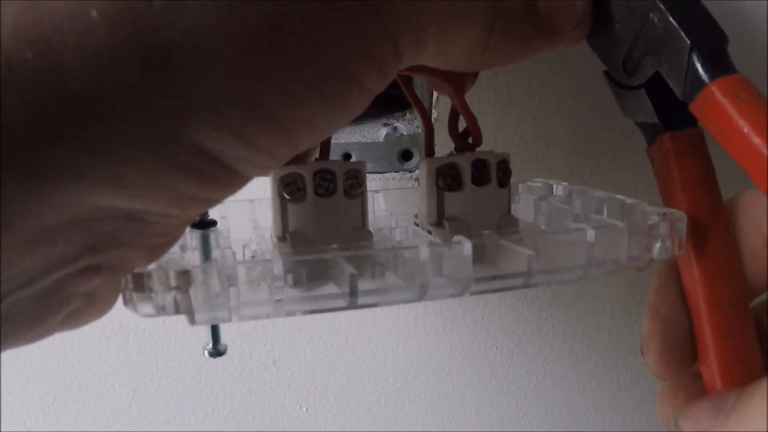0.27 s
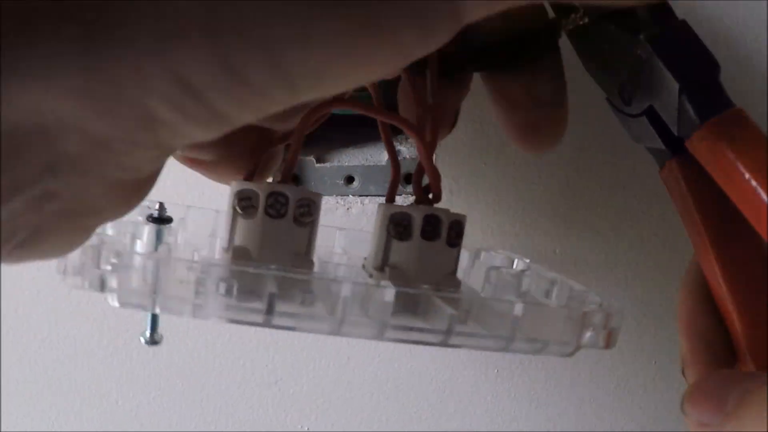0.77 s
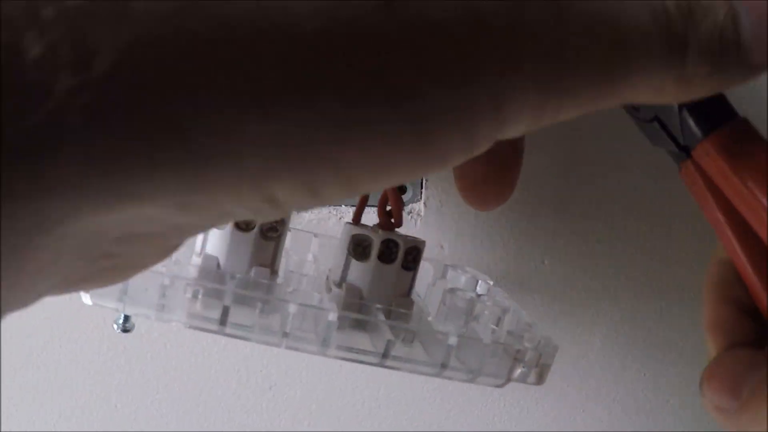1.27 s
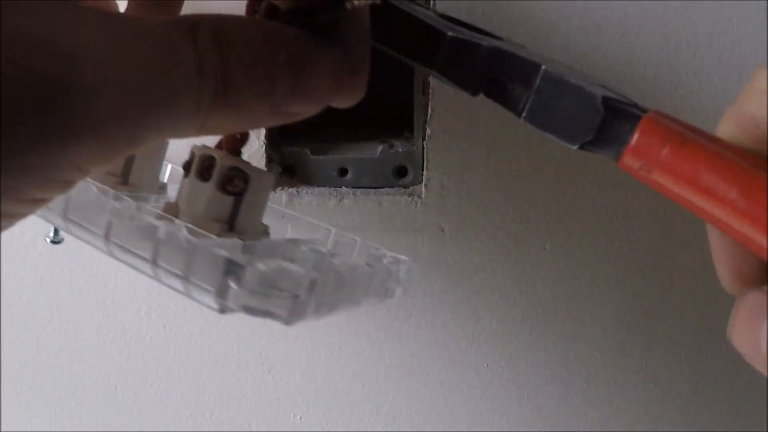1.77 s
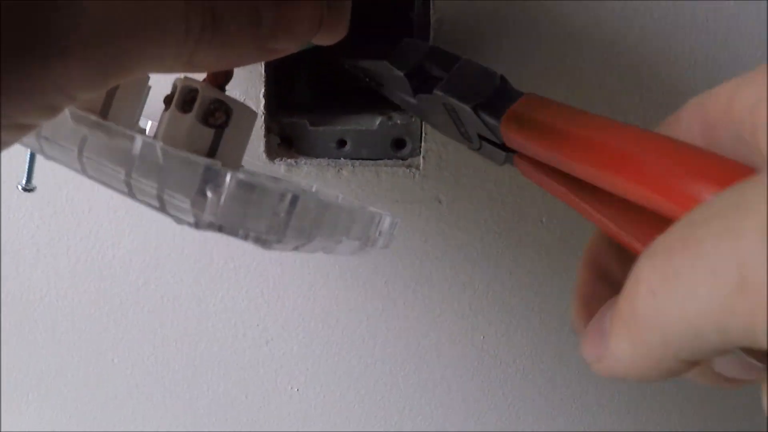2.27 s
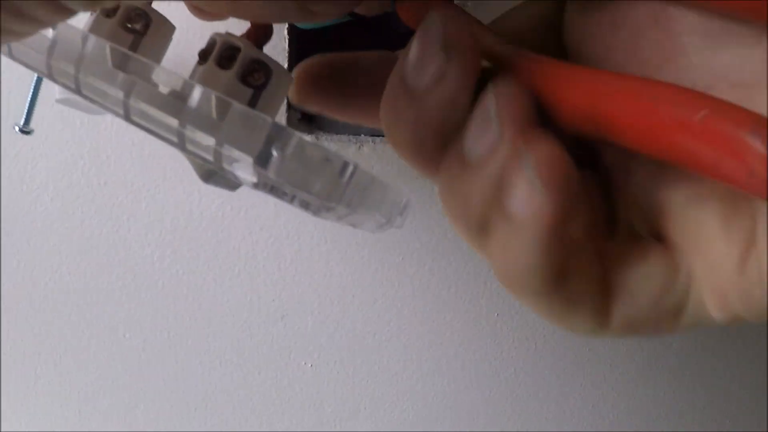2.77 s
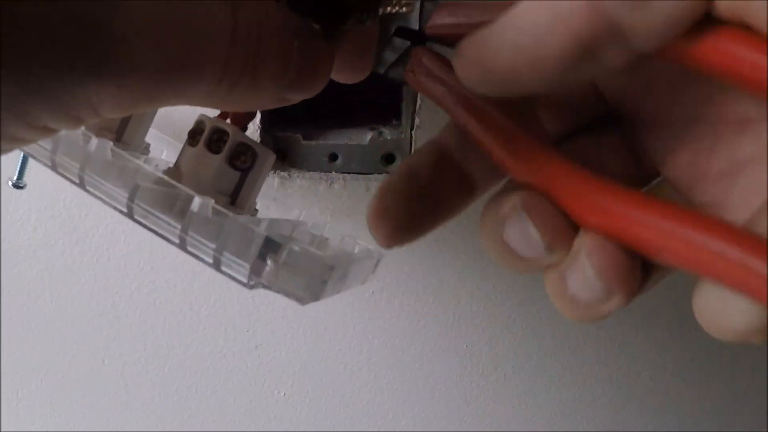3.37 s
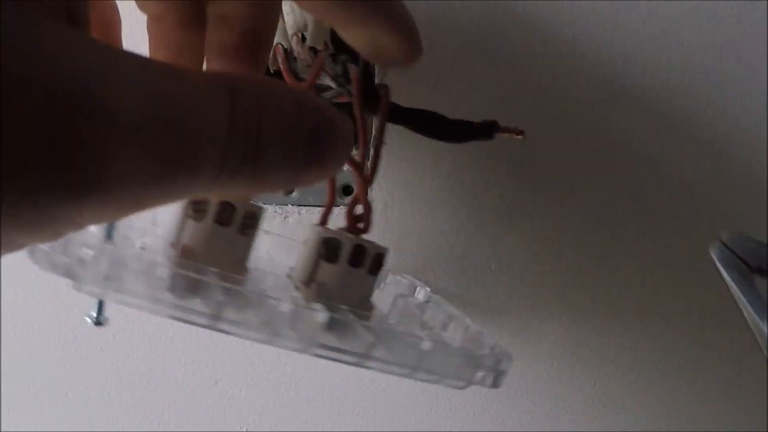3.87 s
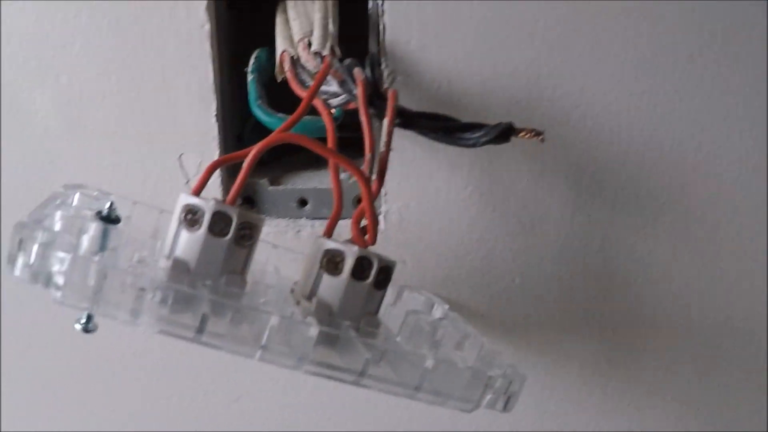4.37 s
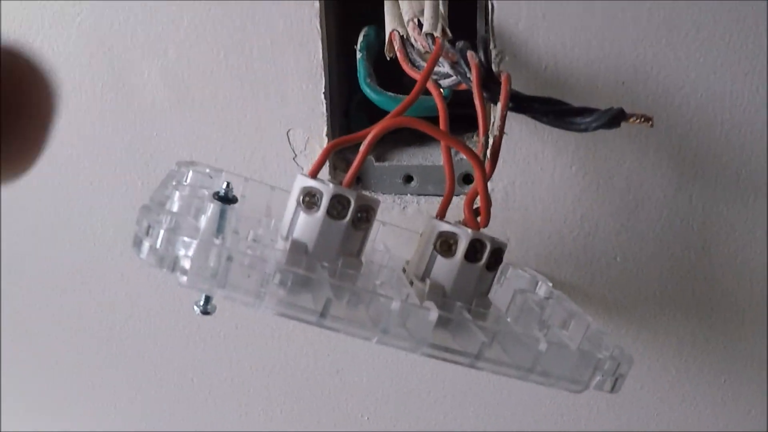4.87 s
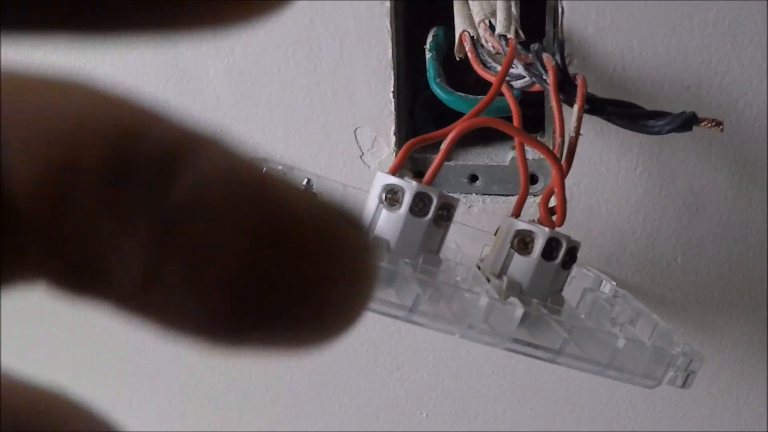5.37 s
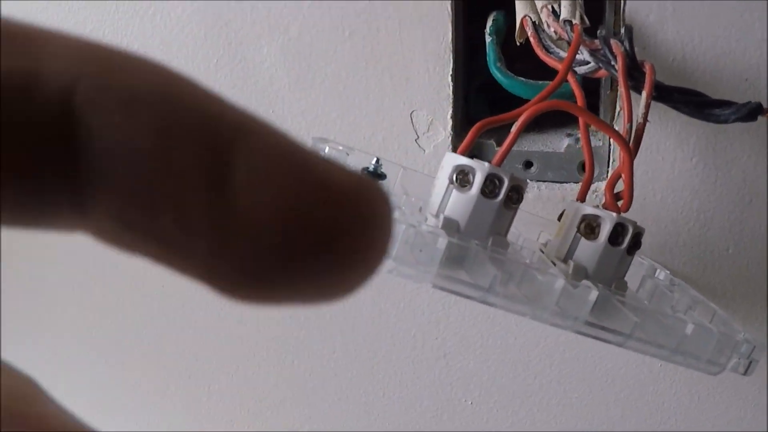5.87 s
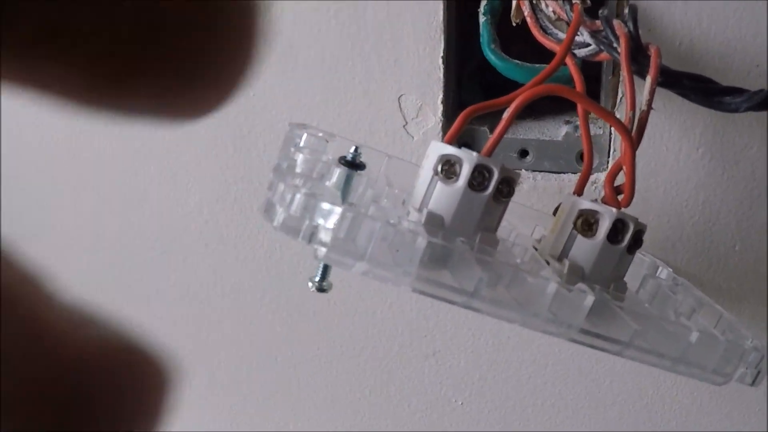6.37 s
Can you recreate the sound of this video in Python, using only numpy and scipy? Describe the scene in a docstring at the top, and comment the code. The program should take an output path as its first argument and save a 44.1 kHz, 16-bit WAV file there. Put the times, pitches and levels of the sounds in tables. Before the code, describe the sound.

Quiet indoor air with a wavering low hum. Faint ticks, then a bright double clack of plier jaws, a pause, more clacks and fine wire scraping with soft low bumps. Then the tool is silent and the camera itself is knocked: boomy thuds, sharp snaps and muffled finger rubs, the loudest overloading the close microphone so that the background dips and returns.

```python
"""A wall box in a quiet room: pliers grip and twist copper wires close to a small camera.
Contacts excite jaws, switch plate and wire strands; dragged wire scrapes as dense random slips.
Hands later shift the camera: its housing thumps, snaps, rubs and rumbles, and the wall rings.
A wavering drone and shaped stereo noise fill the room; overloads make a gain control duck everything."""
import sys
import numpy as np
from scipy import signal
from scipy.io import wavfile

SR = 44100
rng = np.random.default_rng(int(sys.argv[2]) if len(sys.argv) > 2 else 0)


def materialize(psi):
    """Save the field psi as 16-bit PCM at rate SR to the path in sys.argv[1].

    A 1-D psi becomes a single channel; in a 2-D psi each row is a channel.
    """
    bounded = np.clip(np.atleast_2d(psi).T, -1, 1)
    quanta = np.round(bounded * 32767).astype(np.int16)
    wavfile.write(sys.argv[1], SR, quanta)


N = 292824


def from_db(db):
    """Level to amplitude: 20 dB is a factor of ten."""
    return 10 ** (np.asarray(db) / 20)


def rms_one(x):
    """Normalisation: scales to unit rms."""
    return x / np.sqrt(np.mean(x ** 2) + 1e-20)


def filtered(x, order, hz, kind="low"):
    """Butterworth filtering: a maximally flat pass band."""
    return signal.sosfilt(signal.butter(order, hz, kind, fs=SR, output="sos"), x)


def in_time(rows):
    """Linear interpolation: each column of a curve becomes one value a sample."""
    s, *columns = np.transpose(rows)
    return [np.interp(np.arange(N) / SR, s, column) for column in columns]


def strokes(rows, attack_s, release_s):
    """Gating: yields each stroke's soft-edged gate, its progress 0-1 and its other columns."""
    t = np.arange(N) / SR
    for start, length, *columns in rows:
        rise = (t - start) / attack_s
        fall = (start + length - t) / release_s
        gate = np.clip(np.minimum(rise, fall), 0, 1)
        yield gate, np.clip((t - start) / length, 0, 1), *columns


def at_hz(points, hz):
    """Logarithmic frequency: reads a curve of (f, value) on a log axis."""
    f, value = np.transpose(points)
    return np.interp(np.log(hz), np.log(f), value)


def panned(x, pan_db):
    """Interchannel level difference: left over right in dB."""
    return x * from_db([[pan_db / 2], [-pan_db / 2]])


def resonate(x, modes):
    """Modal superposition: parallel resonators of (f/Hz, bandwidth/Hz, level/dB), signs alternating."""
    out = 0
    for k, (hz, width, level_db) in enumerate(modes):
        r = np.exp(-np.pi * width / SR)   # pole radius
        b = [(1 - r * r) / 2, 0, (r * r - 1) / 2]
        a = [1, -2 * r * np.cos(2 * np.pi * hz / SR), r * r]
        out = out + (-1) ** k * from_db(level_db) * signal.lfilter(b, a, x)
    return out


def grains(per_s, spread_db):
    """Stick-slip as a random point process: impulses of uneven size and random sign."""
    size_db = spread_db * np.minimum(rng.exponential(1, N), 4)
    sizes = from_db(size_db) * rng.choice([-1, 1], N)
    return sizes * (rng.random(N) < per_s / SR) + 1e-18


def drift(hz):
    """Slow random modulation: normal values, two per cycle of hz, joined by straight lines."""
    return np.interp(np.arange(N) * 2 * hz / SR, np.arange(1200), rng.standard_normal(1200))


def add(out, sound, s):
    """Superposition: mixes a short sound in at a time."""
    i = round(s * SR)
    out[:, i:i + sound.shape[1]] += sound[:, :N - i]


# contacts of the pliers: t/s, then peak level/dB and main ring f/Hz for jaws, switch plate
# and strands in turn, then left-right level/dB
CONTACTS = [(0.716, -48.5, 3080, -37, 1220, -44, 6400, 6), (0.9066, -25, 4720, -47.5, 1250, -44, 5300, 4),
            (0.913, -40, 2710, -35, 1610, -50, 5340, 7), (0.981, -46.5, 2780, -40.5, 2400, -44, 5940, 5),
            (1.054, -25.5, 4520, -54, 1230, -47, 6480, 9), (1.0716, -9.5, 4260, -18, 2380, -35, 5860, -4),
            (1.0778, -8, 4040, -14.5, 1740, -4.5, 5880, 8.5),
            (1.0846, -31.5, 3850, -28, 1740, -22, 5840, 1), (1.1, -33, 4670, -34, 2430, -34, 5800, 1),
            (1.113, -43.5, 4690, -45, 1790, -26, 5630, 9), (1.119, -41, 3980, -51, 1400, -35, 5830, 2),
            (1.128, -43, 3880, -37, 2350, -34, 5800, 11), (1.238, -33.5, 4630, -38.5, 2350, -52, 6550, 4),
            (1.259, -36, 3700, -40.5, 1220, -42.5, 6750, 7), (1.369, -42, 2850, -33.5, 2280, -43, 6400, 4),
            (1.834, -41, 3100, -50, 1360, -41, 6160, 5), (1.912, -38.5, 4770, -41.5, 1700, -38, 5900, 6),
            (2.3822, -34, 3700, -30.5, 1480, -42, 6100, 4), (2.603, -43, 3640, -33.5, 1370, -45, 6310, 3),
            (2.6388, -15, 2870, -3.5, 1644, -25, 5300, 7.5), (2.644, -40, 2890, -21.5, 1640, -25, 5170, 20),
            (2.65, -9.5, 2910, -10.5, 1750, -18, 5950, 2), (2.657, -20, 2950, -16, 1380, -41, 5840, 7),
            (2.703, -46, 3080, -34, 1340, -47, 5320, 1), (2.759, -32, 3500, -30, 1500, -46, 6200, 6.5),
            (2.974, -37.5, 3600, -40, 1230, -36, 7260, 3), (3.011, -44, 3550, -45.0, 1340, -37, 6550, 5),
            (3.021, -40, 4660, -43, 1390, -45, 5620, 5), (3.032, -44, 3210, -36, 2050, -47, 5920, 8),
            (3.051, -49, 3440, -38, 1470, -51, 7280, 5), (3.145, -50, 2890, -40, 2070, -51, 6240, 6),
            (3.207, -29, 4730, -43, 1210, -34, 6720, 5), (3.213, -24.5, 4900, -30.5, 2390, -31, 6800, 9),
            (3.2195, -35, 2800, -30, 2500, -42, 6550, -2), (3.26, -23, 3700, -23.5, 1860, -22, 6480, 9),
            (3.265, -31, 3430, -33, 1970, -27, 6220, -4), (3.302, -44, 2860, -37, 1800, -43, 6590, 5),
            (3.389, -19, 3480, -27, 1680, -23, 5640, -11), (3.3913, -7.5, 3630, -15, 1660, -16, 5250, 3),
            (3.3958, -36, 3470, -26, 2470, -32, 5410, 4), (3.398, -21, 3600, -24.5, 2600, -12, 5300, 6),
            (3.405, -25, 4940, -39.0, 1780, -32, 5700, 14), (3.413, -36, 4930, -48, 1360, -35.5, 5320, 4.5),
            (3.447, -40, 3360, -44, 1640, -43, 5400, 2.0), (3.614, -54, 3140, -36.5, 1300, -53.5, 7170, 4),
            (3.645, -44, 3190, -27.5, 1480, -40, 6000, 8), (3.7275, -21, 3270, -16, 2580, -15, 5450, 14),
            (3.7291, -8.5, 2970, -22, 2580, -16.5, 7060, -6),
            (3.7358, -15.5, 2980, -27, 2560, -14, 5560, 7), (3.742, -30, 4780, -39, 1210, -28, 5360, 10),
            (3.818, -33.5, 4410, -40, 1490, -38, 6700, 6), (3.982, -51, 2710, -36, 1350, -53, 5510, 5),
            (4.002, -29.5, 4070, -47, 2280, -48, 6740, 6), (4.0236, -27, 4300, -26.5, 1620, -29, 6000, 5),
            (4.029, -34, 4600, -35, 1280, -43, 5400, 7), (4.175, -40, 4500, -36, 2600, -53, 6850, 6),
            (4.474, -44, 2820, -38.5, 1670, -53, 5380, 5)]
# further modes of jaws, switch plate and strands: f/Hz, bandwidth/Hz, level/dB against the main ring
JAW_MODES = [(3300, 390, -6), (3700, 1000, -4), (4330, 530, -3.5)]
PLATE_MODES = [(1710, 320, 3.5), (1683, 140, 1.5), (2280, 340, 3)]
STRAND_MODES = [(5300, 260, -10), (6040, 310, -5.5), (6670, 200, -38.5), (9900, 220, -3.5),
                (13570, 2000, -6.5)]
CHATTER_T60_S = 0.016
IMPACT, IMPACT_PER_DB = 5.7, 0.42   # size at 0 dB; hard contacts are mostly one impact
ONSET_S, ONSET_PER_DB = .00008, 1.1   # time at 0 dB; soft clicks have a slower, noisier onset


def clicks():
    """Modal excitation by impact: one blow and a brief chatter ring plate, jaws and strands."""
    out, t = np.zeros((2, N)), np.arange(round(.05 * SR)) / SR
    chatter = rng.standard_normal((len(CONTACTS), 2, len(t)))
    chatter[:, 1] = 0.79 * chatter[:, 0] + 1.57 * chatter[:, 1]   # partly alike on both channels
    chatter *= from_db(-60 * t / CHATTER_T60_S)
    for contact, small in zip(CONTACTS, chatter):
        s, jaws_db, jaws_hz, plate_db, plate_hz, strands_db, strands_hz, pan_db = contact
        force_db = max(jaws_db, plate_db, strands_db)
        onset_s = ONSET_S * from_db(-ONSET_PER_DB * force_db)
        hits = small * (1 - np.exp(-(t / onset_s) ** 2))
        hits[:, 14] += IMPACT * from_db(IMPACT_PER_DB * force_db)
        parts = ((jaws_db, jaws_hz, JAW_MODES), (plate_db, plate_hz, PLATE_MODES),
                 (strands_db, strands_hz, STRAND_MODES))
        sound = 0
        for level_db, hz, modes in parts:
            # modes far from the main ring sound mainly in the first moments
            near = resonate(hits, [(hz, .75 * hz, 0)])
            main = resonate(near, [(hz, .11 * hz, 2.5)]) + resonate(near, [(hz, .04 * hz, -1)])
            onset = from_db(-3.5) * resonate(hits * np.exp(-t / .0015), modes)
            ring = main + resonate(near, modes) + onset + from_db(-17.5) * near
            sound = sound + from_db(level_db) * ring / np.abs(ring).max()
        add(out, panned(sound, pan_db), s)
    return filtered(out, 3, 10500)


# wire dragged through the jaws: start t/s, length t/s, starting level/dB, fade over the stroke
# level/dB (negative swells), brightest f/Hz
DRAGS = [(.85, 0.1, -65, -8, 5300), (1.085, 0.14, -47, 20, 5570), (1.75, 0.22, -62, 0, 6470),
         (2.655, 0.28, -47.5, 28, 2620), (2.97, 0.19, -55, 23, 5030), (3.21, 0.19, -51.5, 24, 5370),
         (3.4, 0.085, -50.5, 11, 4840), (3.74, 0.14, -48.5, 23, 5450), (3.99, 0.09, -51, 9, 2530)]
SCRAPE_ATTACK_S, SCRAPE_RELEASE_S = 0.0072, 0.021
CATCH_DB, CATCH_HZ = 4, 60   # the dragged wire catches and frees


def scrape():
    """Stick-slip excitation: dense slips ring the clicks' modes, most those near the brightest pitch."""
    slips = grains(per_s=2100, spread_db=1.0)
    modes, out = PLATE_MODES + JAW_MODES + STRAND_MODES, 0
    # under the drag each mode is broader than when struck
    rings = np.array([rms_one(resonate(slips, [(hz, 1.74 * width, 0)])) for hz, width, _ in modes])
    hz, _, mode_db = np.transpose(modes)
    for gate, progress, level_db, fade_db, bright_hz in strokes(DRAGS, SCRAPE_ATTACK_S, SCRAPE_RELEASE_S):
        octaves_off = np.abs(np.log2(hz / bright_hz))
        gain = from_db(mode_db - 19.0 * octaves_off)
        coloured = (gain @ rings) / np.sqrt(gain @ gain)
        out = out + gate * from_db(level_db - fade_db * progress) * coloured
    out = filtered(out, 2, 8000)
    return panned(out * from_db(CATCH_DB * drift(CATCH_HZ)), 3.3)


# blows on housing and wall: t/s, thump level/dB, thump rate f/Hz (scales its time course),
# knock level/dB, wall drive level/dB (before WALL_GAIN_DB), shudder decay t/s
IMPACTS = [(1.077, -62, 59, -30, -36.5, 0.0079), (1.877, -77, 90, -34, -34, 0.0057),
           (1.892, -77, 90, -49, -37, 0.0051), (2.639, -59.5, 71, -46, -29.5, 0.011),
           (2.6549, -46, 71, -44, -19, 0.0091), (2.705, -60, 71, -48, -28.5, 0.019),
           (2.772, -60, 71, -50, -33.5, 0.017), (3.17, -25.5, 80, -41, -38.5, 0.024),
           (3.241, -24, 69.4, -45, -36, 0.021), (3.29, -36, 70, -50, -41, 0.024),
           (3.343, -29, 70, -49.5, -37.5, .015), (3.395, -33, 70, -46, -39.5, 0.025),
           (3.59, -27, 70, -39, -46.5, 0.084), (3.728, -50, 70, -39, -36.5, 0.008),
           (4.033, -60, 80.6, -28, -37, 0.054), (4.687, 1.2, 57.3, -21, -21.5, 0.014),
           (4.796, -7.5, 43, -19.5, -52, .009), (5.046, -24, 61, -40, -42, 0.0072),
           (5.663, -41, 60, -20.5, -55, 0.0077), (5.664, -8, 57.7, -41, -56.5, 0.0064),
           (5.742, -19.5, 44.7, -43, -54, 0.013), (6.031, -49, 60, -18.5, -62.5, .005),
           (6.042, 2.5, 52, -12, -25.5, .005), (6.162, -45, 60, -28, -59, 0.012),
           (6.182, -8, 36, -27.5, -43, 0.03)]
# hollow wall modes: f/Hz, bandwidth/Hz, level/dB
WALL_MODES = [(121.5, 4.1, -3.5), (152, 5.1, 4), (199.6, 11.1, 3), (237, 9.9, -7.5), (281.6, 22, -9.5),
              (399, 16.4, -16), (453, 34, -15), (539, 60, -22.5)]
# housing modes: f/Hz, bandwidth/Hz, level/dB
BODY_MODES = [(190, 105, -3.5), (251, 45, -2), (336, 50, -12), (498, 28, -5.5), (602, 69, -5),
              (633, 40, -4)]
# housing surface modes, the last one broad treble: f/Hz, bandwidth/Hz, level/dB
SURFACE_MODES = [(940, 90, 0.5), (1210, 150, 5), (1490, 260, 0.5), (1838, 270, 2), (3300, 3300, -7.5)]
HOUSING_RING_DB, HOUSING_RING_S = 7.5, 0.007   # against the knock; decay of the drive
SURFACE_RING_DB, SURFACE_RING_S = -13.5, 0.013
# first contact against the shudder that follows, its factor at 0 dB; more so when hard
WALL_STRIKE, STRIKE_PER_DB = 4.7, 0.72
WALL_GAIN_DB = 28.5   # narrow modes pass little of a short shove


def blows():
    """Impulse response: a knock flexes the shell, a soft low push follows, and the wall rings on."""
    out, shove = np.zeros((2, N)), np.zeros((2, N))
    t = np.arange(round(.3 * SR)) / SR
    knock = np.sin(2 * np.pi * 620 * t) * np.exp(-t / 0.00092)
    rattles = rng.standard_normal((len(IMPACTS), len(t)))
    for (s, thump_db, thump_hz, knock_db, ring_db, shudder_s), rattle in zip(IMPACTS, rattles):
        pushed = np.maximum(t - .0013, 0)
        cycles = pushed * thump_hz
        onset = 1 - np.exp(-(pushed / 0.0016) ** 2)
        # the push falls in pitch as the housing settles
        thump = np.sin(2 * np.pi * cycles ** 0.47) * np.exp(-cycles / 0.71) * onset
        add(out, panned(from_db(thump_db) * thump + from_db(knock_db) * knock, -4.0), s)
        shell = filtered(resonate(rattle * np.exp(-t / HOUSING_RING_S), BODY_MODES), 4, 800)
        add(out, panned(from_db(knock_db + HOUSING_RING_DB) * shell, -21.5), s)
        buzz = resonate(rattle * np.exp(-t / SURFACE_RING_S), SURFACE_MODES[:4])
        add(out, panned(from_db(knock_db + SURFACE_RING_DB) * buzz, -4.5), s)
        strike = WALL_STRIKE * from_db(STRIKE_PER_DB * ring_db) * np.sqrt(shudder_s * SR)
        push = rattle * np.exp(-t / shudder_s) + (t == 0) * strike
        add(shove, panned(from_db(ring_db) * push, -1.1), s)
    wall = filtered(resonate(shove + 1e-18, WALL_MODES), 4, 100, "high")
    return out + from_db(WALL_GAIN_DB) * wall


# snaps of the shell, each with a low tone near 140 Hz swelling into it: snap t/s, snap level/dB,
# middle and high ring level/dB (against the low one), swell level/dB, swell f/Hz, growth t/s,
# swell length before the snap t/s, last crest before the snap t/s
SNAP_EVENTS = [(4.6863, -4.5, -17, -37.5, -7, 142.4, 0.034, 0.024, 0.0013),
               (4.797, -26.5, -16, -44.5, -39.5, 138, 0.0075, 0.021, .002),
               (6.042, -4.5, -3.5, -20, -8.5, 140.4, 0.012, 0.038, 0.0018)]
# low, middle and high shell modes of the snap: f/Hz, decay t/s
SHELL_MODES = [(1300, 0.00023), (2280, 0.00057), (3900, 0.00069)]
SNAP_RISE_S, SNAP_TOP_HZ = 0.00054, 4300
FLEX_DB, FLEX_HZ, FLEX_S = -1.5, 330, 0.0029   # the shell swings back


def snaps():
    """Damped modal ringing: a low tone swells into each snap, and the shell rings in its modes."""
    out, lead_s = np.zeros((2, N)), .1
    since = np.arange(round(.15 * SR)) / SR - lead_s   # time from the snap
    after = np.maximum(since, 0)
    rise = np.sin(np.pi / 2 * np.clip(1 + since / SNAP_RISE_S, 0, 1)) ** 2
    low, middle, high = (np.cos(2 * np.pi * hz * after) * np.exp(-after / decay_s)
                         for hz, decay_s in SHELL_MODES)
    flex = from_db(FLEX_DB) * np.sin(2 * np.pi * FLEX_HZ * after) * np.exp(-after / FLEX_S)
    for s, snap_db, middle_db, high_db, swell_db, swell_hz, growth_s, length_s, crest_s in SNAP_EVENTS:
        snap = rise * (low + from_db(middle_db) * middle + from_db(high_db) * high) - flex
        snap = filtered(snap, 6, SNAP_TOP_HZ)
        # grows until 2 ms after the snap, then dies away
        envelope = np.exp(np.minimum((since - .002) / growth_s, (.002 - since) / 0.0028))
        onset = np.clip((since + length_s) / 0.0019, 0, 1)
        swell = np.cos(2 * np.pi * swell_hz * (since + crest_s)) * envelope * onset
        sound = panned(from_db(snap_db) * snap, -3.5) + panned(from_db(swell_db) * swell, -4.0)
        add(out, sound, s - lead_s)
    return out


# skin sliding over the housing: start t/s, length t/s, body starting level/dB, swell over the
# stroke level/dB, surface and treble level/dB (against the body)
SLIDES = [(4.028, 0.059, -28, -17, -16, -18), (4.579, 0.12, -27.5, 16, -12.5, -31),
          (4.81, 0.054, -31.5, 14.5, -10.5, -24.5), (5.691, 0.059, -23.5, -3.5, -11.5, -36),
          (6.155, 0.061, -43.5, -2.5, -6, -25), (6.195, 0.052, -45, 7, 3, -7),
          (6.228, 0.067, -36, 5, -4.5, -17), (6.52, 0.13, -61, 7, 4, -3.5)]
RUB_ATTACK_S, RUB_RELEASE_S = 0.013, 0.029
SURFACE_SWELL = 0.68   # surface and treble take this share of the swell
RUB_PULSE_DB, RUB_PULSE_HZ = 3.5, 71   # the grip of the skin comes and goes
PORT_LAG_SAMPLES = 9


def rub():
    """Stick-slip friction: the lowest mode is alike at both ports, the rest partly inverted and late at left."""
    slips = np.array([grains(per_s=1800, spread_db=5.5), grains(per_s=1600, spread_db=2.0)])
    slips[0] = 0.36 * slips[0] - 0.61 * np.roll(slips[1], PORT_LAG_SAMPLES)
    body = resonate(slips[1], BODY_MODES[:1]) + resonate(slips, BODY_MODES[1:])
    body = rms_one(filtered(body, 6, 700))
    surface = rms_one(filtered(resonate(slips, SURFACE_MODES[:4]), 5, [880, 2150], "band"))
    treble = rms_one(resonate(resonate(slips, SURFACE_MODES[4:]), SURFACE_MODES[4:]))
    out = 0
    for gate, progress, body_db, swell_db, surface_db, treble_db in strokes(SLIDES, RUB_ATTACK_S, RUB_RELEASE_S):
        upper = from_db(surface_db) * surface + from_db(treble_db) * treble
        lower = from_db(swell_db * progress) * body
        upper = from_db(SURFACE_SWELL * swell_db * progress) * upper
        out = out + gate * from_db(body_db) * (lower + upper)
    return panned(out * from_db(RUB_PULSE_DB * drift(RUB_PULSE_HZ)), -2.5)


# tremor of the hands that hold the camera: t/s, deep rumble level/dB, upper rumble level/dB
TREMOR = [(2.6, -78, -85), (2.72, -48, -41), (2.85, -43, -46), (3.01, -48.5, -59), (3.33, -40, -47),
          (3.66, -51.5, -58), (4.05, -49.5, -66), (4.44, -59.5, -70), (4.74, -41, -52.5),
          (4.99, -59.5, -47.5), (5.16, -50, -50), (5.2, -34, -61), (5.38, -43, -58), (5.47, -37, -58),
          (5.62, -47, -51), (5.8, -39, -40.5), (6.0, -43, -58), (6.11, -19.5, -58.5), (6.29, -47, -57),
          (6.42, -40, -53.5), (6.64, -42, -43)]


def rumble():
    """Band-limited random vibration: muscle tremor shakes both ports nearly alike."""
    deep_db, upper_db = in_time(TREMOR)
    shake = rng.standard_normal(N) + .2 * rng.standard_normal((2, N))
    deep = rms_one(filtered(shake, 2, [20, 62], "band"))
    upper = rms_one(filtered(shake, 3, [62, 100], "band"))
    return panned(from_db(deep_db) * deep + from_db(upper_db) * upper, -2.1)


ROOM_T60_S, ROOM_DB = .12, -23


def room(x):
    """Reverberation: convolution with a short dull decaying noise, another on each channel."""
    t = np.arange(round(.3 * SR)) / SR
    tail = rng.standard_normal((2, len(t))) * from_db(-60 * t / ROOM_T60_S)
    tail = filtered(tail * (1 - np.exp(-t / 0.0023)), 2, 7000)
    tail = tail / np.sqrt((tail ** 2).sum(axis=1, keepdims=True))
    return signal.fftconvolve(x, tail, axes=1)[:, :N]


def ports(x):
    """All-pass dispersion: the path round the housing turns the right port's phase, half a cycle near 2 kHz."""
    r, w = np.exp(-np.pi * 600 / SR), 2 * np.pi * 2150 / SR
    a = np.array([1, -2 * r * np.cos(w), r * r])
    return np.array([x[0], signal.lfilter(a[::-1], a, x[1])])


# tones of the drone: f/Hz, bandwidth/Hz, level/dB (against each other)
DRONE_MODES = [(158.8, 17.5, -4), (199, 3.16, 5.5), (247, 106, -11)]
DRONE_DB, DRONE_WAVER_DB, DRONE_WAVER_HZ = -51.5, 3.5, 2.5


def drone():
    """Narrow-band noise: resonances fed with noise hum at a slowly wavering level."""
    level_db = DRONE_DB + DRONE_WAVER_DB * drift(DRONE_WAVER_HZ)
    hum = rms_one(resonate(rng.standard_normal((2, N)), DRONE_MODES))
    return from_db(level_db) * panned(hum, -3.5)


# likeness of the two channels: f/Hz, correlation (1 alike, -1 opposed)
CHANNEL_LIKENESS = [(60, 0.33), (120, -0.093), (240, -0.33), (480, -0.8), (950, -0.85), (1890, -0.38),
                    (3770, 0.27), (7520, 0.12), (15000, -0.44)]
# balance of the two channels: f/Hz, left-right level/dB
CHANNEL_LEAN = [(60, -12.5), (130, 1.5), (290, -4.5), (640, -1), (1410, 0.5), (3100, 0.5), (6820, -4),
                (15000, -3)]


def banded_noise(spectrum):
    """Third-octave synthesis: noise bands, each with its own level, likeness and balance; rms 1."""
    out, edges = 0, 112 * 2 ** (np.arange(23) / 3)
    white = rng.standard_normal((2, 2, N))   # neighbouring bands use separate noises
    for k, (low, high) in enumerate(zip(edges, edges[1:])):
        mid, side = filtered(white[k % 2], 2, [low, high], "band")
        hz = np.sqrt(low * high)
        alike = np.clip(at_hz(CHANNEL_LIKENESS, hz), -1, 1)
        pair = np.sqrt(1 + alike) * mid + np.sqrt(1 - alike) * side * [[1], [-1]]
        out = out + from_db(at_hz(spectrum, hz)) * panned(pair, at_hz(CHANNEL_LEAN, hz))
    return rms_one(out)


# spectrum of the room air: f/Hz, relative level/dB per Hz
AIR_SPECTRUM = [(59, -72), (100, -42), (124, -55), (143, -12.5), (202, -2.5), (229, -11), (492, -7.5),
                (872, -9.5), (1480, -14.5), (1680, -20), (1870, -20.5), (4770, -30), (9820, -27),
                (14400, -48), (16000, -53)]
AIR_DB = -46


def air():
    """Spectral density: steady noise follows the spectrum of the room air."""
    return from_db(AIR_DB) * banded_noise(AIR_SPECTRUM)


def scene():
    """Linear superposition of tool, handling and room noise; the still air carries no deep bass."""
    tool = clicks() + scrape()
    handling = blows() + snaps() + rub() + rumble()
    still = filtered(drone() + air(), 8, 128, "high")
    return ports(tool) + from_db(ROOM_DB) * room(tool) + handling + still


def released(cut_db, db_per_s):
    """Peak hold with linear release: each cut is let go at a steady rate in dB."""
    ramp = db_per_s * np.arange(N) / SR
    return np.maximum.accumulate(cut_db + ramp) - ramp


CUTOFF_HZ = 16500


def record(dry):
    """Gain control lags an overload, recovers fast then slowly; saturation rounds peaks, the top is cut."""
    sensed = filtered(dry[1], 2, 1200)   # lows of the right channel steer both
    sensed_db = 20 * np.log10(np.abs(sensed) + 1e-9)
    over_db = np.clip(15 * (sensed_db + 1.5), 0, 19.5)
    cut_db = np.maximum(released(over_db, 165), released(0.4 * over_db, 8.0))
    r = np.exp(-1 / (0.0065 * SR))
    lagging_db = signal.lfilter([(1 - r) ** 2], [1, -2 * r, r * r], cut_db)
    levelled = dry * from_db(-lagging_db)
    rounded = levelled / (1 + np.abs(levelled) ** 6) ** (1 / 6)
    return signal.sosfilt(signal.cheby2(8, 50, CUTOFF_HZ, fs=SR, output="sos"), rounded)


dry = scene()
out = record(dry)
materialize(out)
```